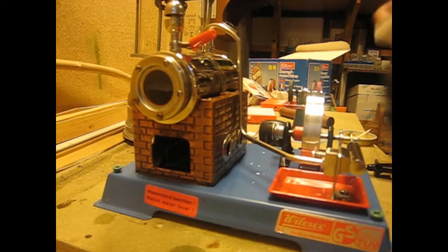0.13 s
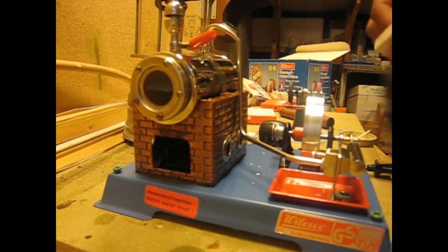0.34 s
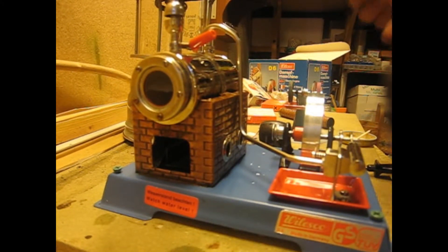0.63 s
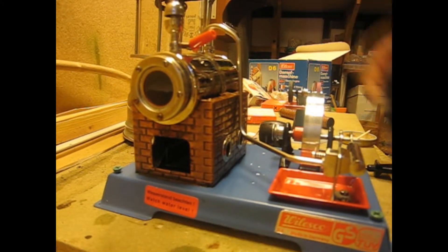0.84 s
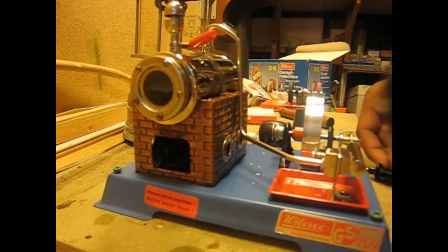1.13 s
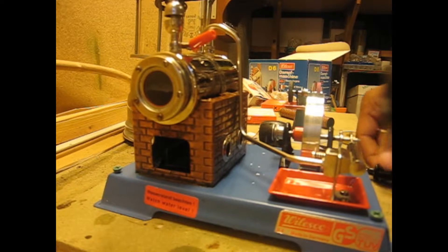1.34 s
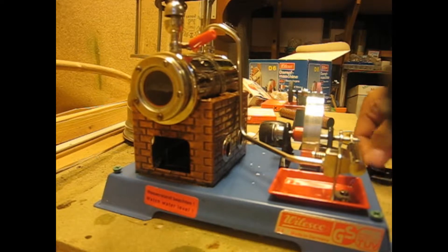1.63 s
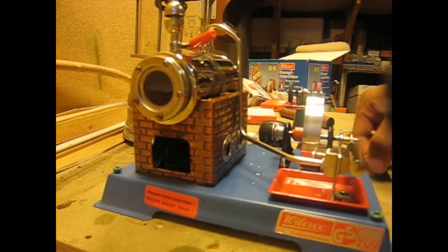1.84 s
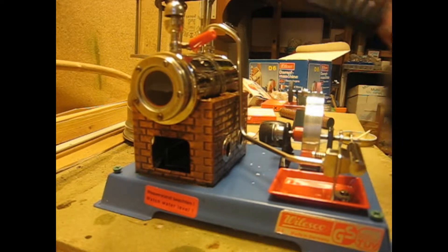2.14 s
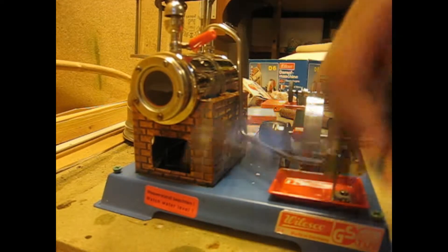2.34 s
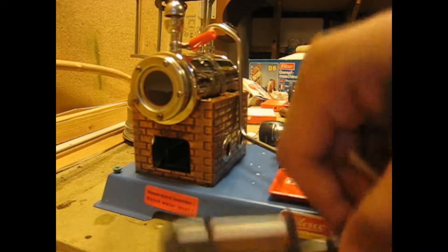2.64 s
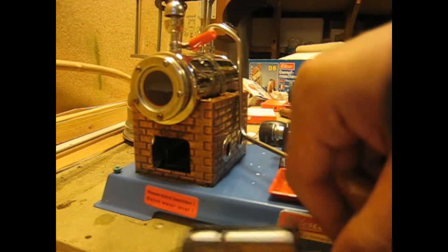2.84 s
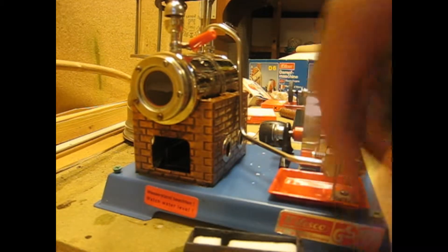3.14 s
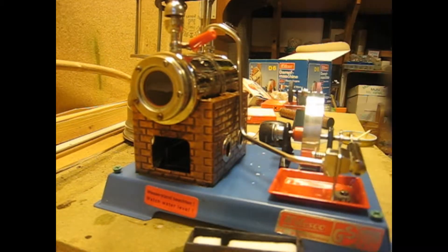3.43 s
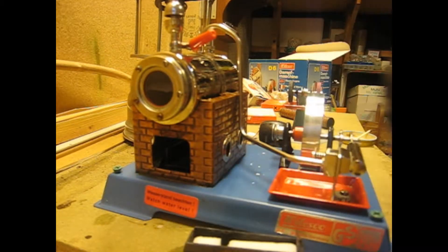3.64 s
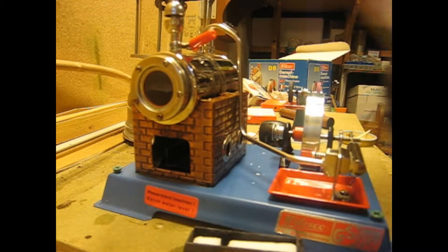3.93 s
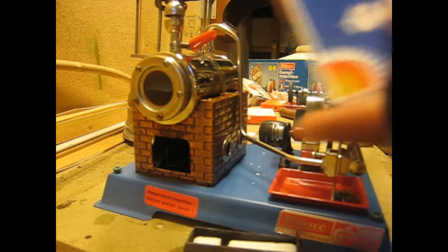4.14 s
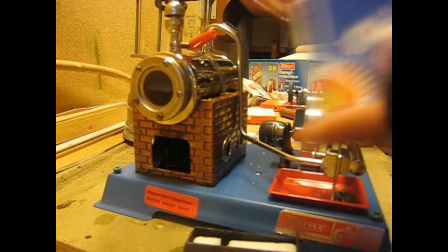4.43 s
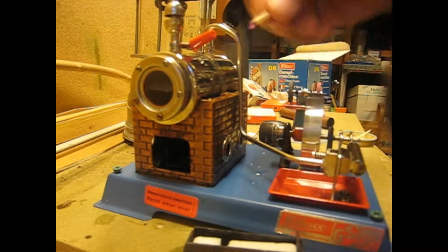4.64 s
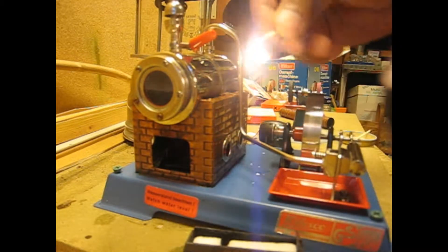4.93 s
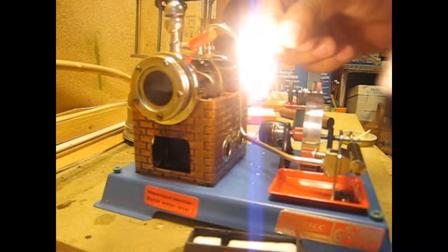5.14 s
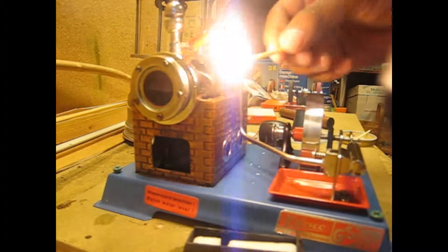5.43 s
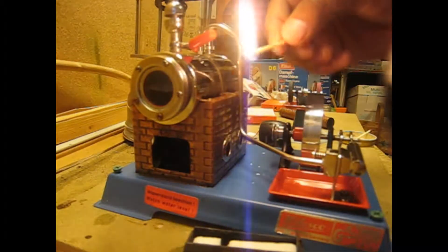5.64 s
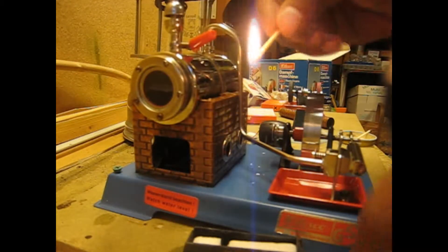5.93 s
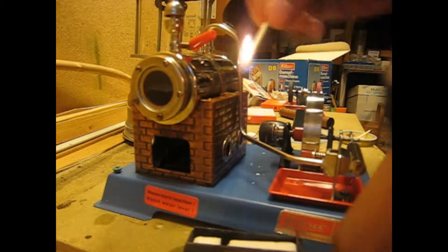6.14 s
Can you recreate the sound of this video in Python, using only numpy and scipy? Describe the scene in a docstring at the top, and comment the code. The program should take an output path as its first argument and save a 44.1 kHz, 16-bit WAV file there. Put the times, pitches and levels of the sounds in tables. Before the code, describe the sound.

Loose matches rattle in a card box, tin knocks ring briefly, then wooden snaps, one quick match strike, a faint flare and a shutting scrape.

```python
"""Matchbox and tin parts on a workbench

Beside a toy steam engine a matchbox rattles and small tin parts are set down. The drawer slides open,
a match is picked out and struck; it pops alight and hisses while the drawer scrapes shut.
Contacts are short damped cycles and friction is a train of random slips; both excite resonant bodies.
The sum is kept in coarse steps at a quarter of the rate, leaving faint mirror images in the treble.
"""
import sys
import numpy as np
from scipy import signal
from scipy.fft import rfft, irfft, next_fast_len
from scipy.io import wavfile
from scipy.ndimage import map_coordinates

SR = 44100
rng = np.random.default_rng(int(sys.argv[2]) if len(sys.argv) > 2 else 0)


def generate_wav(signal):
    """Clip the signal to [-1, 1] and save it as 16-bit WAV at the path in sys.argv[1]."""
    frames = np.transpose(np.atleast_2d(signal))
    scaled = np.clip(frames, -1, 1) * 32767
    pcm = np.round(scaled).astype(np.int16)
    wavfile.write(sys.argv[1], SR, pcm)


N = 277171  # length in samples

# Levels in the tables are nominal: the sources weight them further.

# Shakes throwing the loose matches against a wall: start_s, length_s, level_db
RATTLES = [(0, 0.045, -41), (0.048, 0.013, -33.5), (0.193, 0.0079, -37.5), (0.218, .012, -33.5),
           (.274, .015, -26), (0.318, .029, -24), (0.465, 0.0083, -32), (0.506, 0.007, -33.5)]
TUMBLE_S, TUMBLE_DB = .04, -15  # after each throw the matches tumble on, this long and this much softer
# Resonances of the full box: centre_hz, width_hz, level_db
FULL_BOX = [(595, 100, -1.5), (1113, 190, -4), (1575, 260, -1), (2287, 300, 0.5), (3710, 400, -0.5),
            (5285, 1300, -9)]
# Narrow resonances of the card walls: centre_hz, width_hz, level_db
WALLS = [(592, 45, -1.5), (1298, 41, -2), (1457, 39, -1), (1595, 48, -2.5), (1830, 47, -3),
         (2142, 48, -4.5), (3194, 62, -5), (3800, 48, -7)]

# Matches sliding down the tilted box
SETTLE_S, SETTLE_LENGTH_S, SETTLE_DB, SETTLE_RISE_DB = .443, .212, -44.5, 7
# Resonances of the sleeve as matches settle and slide: centre_hz, width_hz, level_db
SLEEVE = [(1610, 490, 1.5), (3590, 970, -6.5)]

# Tin parts set down: start_s, clack_db, near_edge_hz, far_edge_hz, far_edge_delay_s, tin_ring_db, thud_db
KNOCKS = [(1.1351, -11.5, 1750, 1000, 0.0053, -16.5, -32.5), (1.6225, -20, 950, 560, .019, -34, -30.5),
          (1.926, -42, 1073, 2600, .006, -51, -45), (2.798, -9.5, 1150, 1500, 0.0091, -17.5, -29.5),
          (2.943, -42, 966, 963, 0.013, -61, -36.5), (3.0791, -10.5, 900, 1800, 0.013, -16.5, -22.5)]
ROCK_LOSS_DB, RING_LOSS_DB, THUD_LOSS_DB = 5, 9, 4.5  # losses at the second contact
LOSS_GROWTH, ROCK_SPREAD = 1.3, .85  # later contacts lose ever more; a spread under 1 closes them up
# A part's high mode; a duller contact feeds it less, by this much per octave
BRIGHT_HZ, BRIGHT_DB, BRIGHT_FALL_DB = 2750, 3.5, 12
# Modes of the engine's tin base plate: mode_hz, level_db, t60_s
TIN_MODES = [(531, -20, 0.17), (803, -15.5, 0.14), (916, -16.5, 0.13), (1050, -8.5, 0.11),
             (1182, -14, 0.097), (1314, -20.5, 0.13), (1482, -16, 0.13), (1626, -3.5, .11),
             (1910, -23.5, 0.054), (2190, -21.5, 0.063), (2695, -15.5, 0.088), (2570, -15, 0.1),
             (2900, -35.5, 0.17), (3030, -35, .07)]
# Spectrum of the bench thud: frequency_hz, density_db (dB per Hz)
BENCH_SPECTRUM = [(30, -14.5), (55, -4), (85, 4), (120, -5), (165, -2), (220, -3), (285, 3), (370, -13.5),
                  (800, -12), (1500, -24.5), (3000, -37)]
# The bench top flexing under a hand: start_s, level_db
BUMPS = [(3.14, -28), (6.05, -38), (6.111, -32)]
# The bench's lowest mode relative to the thud; extra dB of flexing per dB of thud above -30 dB
FLEX_DB, FLEX_GROWS = 2, .7

DRAG_S, DRAG_LENGTH_S, DRAG_DB = 1.15, .4, -44  # a part dragged over the bench
# Its resonance sinks ever faster; it bites just before it stops
DRAG_START_HZ, DRAG_SINK_HZ, DRAG_BEND, DRAG_BITE_DB = 2503, 814, 1.4, 4
# Spectrum of the dragged part: frequency_hz, density_db (dB per Hz)
DRAG_SPECTRUM = [(60, -4), (200, -1), (450, -8.5), (600, -1), (900, -5), (2800, -4.5), (4000, -5.5),
                 (5500, -12.5)]

# A part rubbing on the bench around its landing: start_s, length_s, level_db
RUBS = [(1.596, .024, -35.5), (1.655, .045, -41), (1.81, .045, -48), (1.885, .065, -44.5)]
# Spectrum of the rubbing: frequency_hz, density_db (dB per Hz)
RUB_SPECTRUM = [(70, -3), (280, 0), (420, -8), (900, -4), (1400, -14), (3000, -22), (5000, -35)]

# A few matches shifting as the box is moved: start_s, length_s, level_db, pitch_hz
SHIFTS = [(2.04, .018, -49.5, 1479), (2.128, .014, -43, 3770), (2.281, 0.015, -39, 3106),
          (2.516, 0.012, -48, 4320), (3.488, .036, -45.5, 4780), (3.65, 0.039, -40.5, 2377)]

# Pushes on the drawer, two to open it and two to shut it: start_s, length_s, level_db
SLIDES = [(3.318, 0.39, -41.7), (3.771, .048, -40.5), (5.163, .03, -34), (5.22, .225, -30.3)]
SLIDE_ATTACK_S, SLIDE_RELEASE_S = .01, .035  # how fast a push starts and ends
UNEVEN_DB, UNEVEN_PER_S = 1.3, 50  # the drawer's friction comes and goes: depth, knots per second
# The drawer's hardest catches: start_s, level_db
JERKS = [(3.384, -30), (3.431, -27.5), (3.5475, -28), (3.576, -29.5), (3.692, -32), (3.731, -36),
         (3.807, -30), (5.2225, -17), (5.2805, -22), (5.3505, -17), (5.382, -23), (5.402, -12.5),
         (5.422, -22.5)]
JERK_S = .0036  # length of one catch
# Resonances of the hollow drawer: centre_hz, width_hz, level_db
DRAWER_BODY = [(560, 380, -20), (1345, 180, 0), (2193, 550, -12), (3370, 870, -18)]
# Spectrum of the whole box jolting in the hand: frequency_hz, density_db (dB per Hz)
JOLT_SPECTRUM = [(35, -9.5), (70, 2.5), (200, -4.5), (450, -17.5), (1000, -28.5), (3000, -34.5)]
# Jolt levels; the first three are relative to their cause
SCUFF_JOLT_DB, SNAP_JOLT_DB, JERK_JOLT_DB, PUSH_JOLT_DB = -8, -28, -20, -29

# Fingers scuffing the card: start_s, length_s, level_db
SCUFFS = [(3.898, 0.041, -40.5), (3.962, .035, -32.5), (4.076, .027, -36), (4.223, .034, -26),
          (4.342, 0.065, -38.5), (4.63, 0.056, -42)]
# Resonances of the scuffed wall: centre_hz, width_hz, level_db
CARD = [(620, 400, -8.5), (1704, 650, -1), (3370, 1100, -8)]

# Single snaps of wood on card: start_s, level_db, pitch_hz
SNAPS = [(3.8987, -15, 1990), (4.0645, -23, 2290), (4.092, -22, 1796), (4.1302, -12, 3050),
         (4.1497, -17.5, 3130), (4.344, -25, 1330), (4.358, -19.5, 1690), (4.3734, -20.5, 1800),
         (4.234, -18, 1750), (4.410, -26, 1300), (4.4477, -13, 1930), (4.47, -3.5, 2080),
         (4.6767, -15.5, 3000), (4.964, -23, 2650), (5.358, -12.5, 2670), (5.404, -7.5, 2600)]
SNAP_WALL_HZ, SNAP_WALL_DB = 1650, -11  # the wall's own note under every snap

# The match head lands, skips along the striker at this period and grips this long each time
STRIKE_S, SKIP_S, GRIP_S = 4.4475, .0112, .0075
# Pressure peaks at this share of the stroke and falls off to both sides
STRIKE_DB, STRIKE_PEAK, STRIKE_ARCH_DB = -19.3, .45, 20
STRIKE_BRIGHTEN_DB = 9  # growth of the rasp's upper resonance along the stroke
PANEL_START_HZ, PANEL_END_HZ = 536, 740  # the panel's resonance climbs as the head nears its end
# The striker's rasp and its upper resonance: centre_hz, width_hz, level_db
STRIKER = [(1900, 500, -7), (3520, 1800, -13)]

IGNITE_S, BURN_S, FLARE_DB, FLARE_SAG_DB = 4.7695, .87, -39.8, -6  # the head catches, then burns down
SPUTTER_DB, SPUTTER_PER_S = 1.3, 25  # the flame's hiss comes and goes: depth, knots per second
# Resonances of the flame's hiss: centre_hz, width_hz, level_db
FLAME = [(133, 120, 0.5), (613, 69, 5.5), (1300, 520, -5), (2530, 800, -4), (4260, 1900, -9.5)]

# Spectrum of the faint rumble and hiss of the workshop: frequency_hz, density_db (dB per Hz)
AIR = [(20, -3.5), (50, -4), (90, 4.5), (130, -5.5), (300, -8.5), (700, -15), (2000, -18), (5000, -26.5)]
# Response of the smoothing between stored steps: frequency_hz, gain_db
INTERPOLATION = [(1500, 0.5), (3000, -2), (3800, -2), (4600, -6), (5500, -9), (7200, -25.5), (9000, -47),
                 (10000, -64.5)]
STEP, TOP_HZ = 1 / 128, 10104  # size of a stored step (full scale 1); upper limit of the band


def amp(db):
    """Decibels: a gain is ten to the power of dB / 20."""
    return 10 ** (np.asarray(db) / 20)


def unit(x):
    """Normalization: scale a signal to rms 1."""
    return x / np.sqrt(np.mean(x ** 2) + 1e-20)


def add(track, s, x):
    """Superposition: mix x into the track from time s."""
    part = track[max(0, round(s * SR)):][:len(x)]
    part += x[:len(part)]


def filtered(x, response):
    """Linear filtering: multiply the spectrum of x by a function of frequency."""
    m = next_fast_len(len(x) + 8192)
    return irfft(rfft(x, m) * response(np.fft.rfftfreq(m, 1 / SR)), m)[:len(x)]


def coloured(x, points):
    """Spectral shaping: a gain in dB, interpolated over log frequency."""
    hz, db = np.transpose(points)
    return filtered(x, lambda f: amp(np.interp(np.log(f + 1), np.log(hz), db)))


def resonate(x, body):
    """Modal response: damped resonators in parallel, of alternating polarity."""
    def response(f):
        total = 0
        for k, (centre, width, db) in enumerate(body):
            damping = 1j * f * width
            total = total + (-1) ** k * amp(db) * damping / (centre * centre - f * f + damping)
        return total
    return filtered(x, response)


def level(s, length, db, attack, release, change_db=0):
    """Envelope: an attack, a hold that drifts by change_db, and a release."""
    t = np.arange(N) / SR - s
    hold = amp(db + change_db * np.clip(t / length, 0, 1))
    return hold * np.clip(t / attack, 0, 1) * np.clip(1 - (t - length) / release, 0, 1) ** 2


def grit(n, rate, smooth):
    """Dry friction: tiny slips at random moments over a smooth hiss."""
    happens = rng.random(n) < rate / SR
    slips = happens * rng.choice([-1, 1], n) * np.exp(.35 * rng.standard_normal(n))
    return unit(slips) + smooth * rng.standard_normal(n)


def stroke(length, body, rate, smooth, release, attack):
    """Friction-driven resonance: a short run of slips rings a body and fades."""
    t = np.arange(SR // 4) / SR
    envelope = (1 - np.exp(-t / attack)) * np.exp(-np.maximum(t - length, 0) / release)
    x = resonate(grit(len(t), rate, smooth) * envelope, body)
    return x / np.sqrt(np.sum(x ** 2) / np.sum(envelope ** 2))


def click(hz, cycles, crack):
    """Impact: a few swelling and dying cycles with a noisy edge, of peak 1."""
    t = np.arange(SR // 20) / SR
    u = t * hz / cycles
    edge = coloured(rng.standard_normal(len(t)), [(1500, 9.0), (5000, 6.5), (7000, -42.0)])
    x = u * np.exp(1 - u) * np.sin(2 * np.pi * hz * t) + crack * edge * np.exp(-u / 2)
    return x / np.abs(x).max()


def ring(modes, attack, scatter_db):
    """Free vibration: exponentially decaying modes, at new strengths for each blow."""
    t = np.arange(SR // 2) / SR
    x = np.zeros(len(t))
    for hz, db, t60 in modes:
        decay = amp(db + scatter_db * rng.normal() - 60 * t / t60)
        x += decay * np.sin(2 * np.pi * (hz * t + rng.random()))
    return x * (1 - np.exp(-t / attack))


def puff(spectrum, attack, t60):
    """High modal density: a toneless decaying noise of peak rms about 1."""
    t = np.arange(SR // 2) / SR
    noise = unit(coloured(rng.standard_normal(len(t)), spectrum))
    return noise * (1 - np.exp(-t / attack)) * amp(-60 * t / t60)


def ticks(length, rate, centre_hz):
    """Random impacts: matches hit each other, each at its own pitch; rms 1 over the length."""
    out = np.zeros(SR // 4)
    draws = rng.random((40, 3))[:int(np.clip(2 + length * rate, 2, 40))]
    for when, size, pitch in draws:
        hz = centre_hz * 2 ** (1.4 * (pitch - .5))
        add(out, when * length, amp(-14 * size) * click(hz, cycles=3.7, crack=0.57))
    return out / np.sqrt(np.sum(out ** 2) / (length * SR))


def wobble(rate):
    """Slow fluctuation: a smooth random curve with this many knots a second."""
    knots = rng.standard_normal(int(N * rate / SR) + 4)
    return map_coordinates(knots, [np.arange(N) * rate / SR])


def matchbox():
    """Coupled resonance: rattles, shifts, scuffs and snaps make the card walls ring on briefly."""
    out = rattles() + shifts() + scuffs() + snaps()
    return out + amp(-1.0) * sum(resonate(out, [mode]) for mode in WALLS)


def rattles():
    """Collision noise: thrown matches strike the full box, then tumble on more softly."""
    out = np.zeros(N)
    for s, length, db in RATTLES:
        for start, span, loud_db in [(s, length, db), (s + length, TUMBLE_S, db + TUMBLE_DB)]:
            body = stroke(span, FULL_BOX, rate=1200, smooth=0.34, release=0.011, attack=0.0013)
            add(out, start, amp(loud_db - 2) * body)
            add(out, start, amp(loud_db - 6.5) * ticks(span, rate=280, centre_hz=3400))
    return out


def settling():
    """Sliding friction: matches slip down the tilted box and excite its sleeve, ever louder."""
    slide = unit(resonate(grit(N, rate=600, smooth=.6), SLEEVE))
    return slide * level(SETTLE_S, SETTLE_LENGTH_S, SETTLE_DB, attack=0.012, release=.035,
                         change_db=SETTLE_RISE_DB)


def knocks():
    """Rocking impact: a part settles edge to edge; each contact clacks, rings the plate and thuds."""
    out = np.zeros(N)
    for s, db, near_hz, far_hz, delay, tin_db, thud_db in KNOCKS:
        for k, hz in enumerate([near_hz, far_hz, near_hz, far_hz]):
            when, spent = s + delay * k ** ROCK_SPREAD, k ** LOSS_GROWTH
            clack_db = db - ROCK_LOSS_DB * spent
            bright_db = BRIGHT_DB - BRIGHT_FALL_DB * np.log2(BRIGHT_HZ / hz)
            clack = click(hz, cycles=1.1, crack=0.13)
            clack = clack + amp(bright_db) * click(BRIGHT_HZ, cycles=2.6, crack=.22)
            add(out, when, amp(clack_db) * clack)
            clatter = puff([(300, -9), (950, -1), (1700, -7), (3000, -4), (5000, -39)],
                           attack=0.0012, t60=0.055)
            add(out, when, amp(clack_db - 17.5) * clatter)
            # a contact feeds most the plate modes near its own pitch
            modes = [(f, gain_db - 9.5 * abs(np.log2(f / hz)), t60) for f, gain_db, t60 in TIN_MODES]
            plate = ring(modes, attack=0.0013, scatter_db=0.5)
            add(out, when, amp(tin_db + 3.5 - RING_LOSS_DB * spent) * plate)
            thud = puff(BENCH_SPECTRUM, attack=0.0019, t60=0.18)
            add(out, when, amp(thud_db - THUD_LOSS_DB * spent) * thud)
        add(out, s, flex(thud_db + FLEX_DB + FLEX_GROWS * max(0, thud_db + 30)))
    return out


def flex(db):
    """Fundamental mode: the bench top's lowest resonance, struck once."""
    return amp(db) * ring([(86, 0.0033, .15)], attack=0.0062, scatter_db=1)


def drag():
    """Moving resonance: a fine scrape sinks as the part slides; the bench rumbles under it at first."""
    travel = np.clip((np.arange(N) / SR - DRAG_S) / DRAG_LENGTH_S, 0, 1)
    phase = 2 * np.pi * np.cumsum(DRAG_START_HZ - DRAG_SINK_HZ * travel ** DRAG_BEND) / SR
    # low-passed friction times a cosine makes a noise band around the sinking pitch
    band = unit(filtered(grit(N, rate=700, smooth=0.56), lambda f: 1 / (1 + (f / 310) ** 2)))
    body = unit(coloured(grit(N, rate=900, smooth=.8), DRAG_SPECTRUM))
    scrape = amp(DRAG_BITE_DB * travel ** 12) * (amp(1.8) * band * np.cos(phase) + amp(2.2) * body)
    rumble_spectrum = [(70, -11), (160, 0.5), (290, 0), (400, -20), (1500, -47)]
    rumble = unit(coloured(rng.standard_normal(N), rumble_spectrum)) * amp(3.5 - 26 * travel)
    return level(DRAG_S, DRAG_LENGTH_S, DRAG_DB, attack=0.012, release=0.029) * (scrape + rumble)


def rubbing():
    """Sliding friction: a part rubs dully on the bench around its landing."""
    pressure = sum(level(s, length, db, attack=.02, release=.035) for s, length, db in RUBS)
    return pressure * unit(coloured(grit(N, rate=400, smooth=.4), RUB_SPECTRUM))


def shifts():
    """Sparse impacts: a few matches tick together as the box is moved."""
    out = np.zeros(N)
    for s, length, db, hz in SHIFTS:
        add(out, s, amp(db) * ticks(length, rate=680, centre_hz=hz))
    return out


def bumps():
    """Impulsive load: a hand flexes the bench top."""
    out = np.zeros(N)
    for s, db in BUMPS:
        add(out, s, flex(db))
    return out


def drawer():
    """Stick-slip: the drawer catches and slips in its sleeve and rings the hollow of the box."""
    push = sum(level(s, length, db, SLIDE_ATTACK_S, SLIDE_RELEASE_S) for s, length, db in SLIDES)
    hollow = unit(resonate(grit(N, rate=700, smooth=0.36), DRAWER_BODY))
    # sticks pinched by the moving drawer
    crackle = unit(resonate(grit(N, rate=89, smooth=0.091), [(2750, 1000, 0)]))
    friction = amp(UNEVEN_DB * wobble(UNEVEN_PER_S))
    out = push * friction * (amp(0.2) * hollow + amp(-14) * crackle)
    for s, db in JERKS:
        catch = stroke(JERK_S, DRAWER_BODY, rate=1800, smooth=0.67, release=0.0032, attack=0.00053)
        add(out, s, amp(db - 1.5) * catch)
        add(out, s, jolt(db + JERK_JOLT_DB))
    shutting_s = SLIDES[2][0]
    add(out, shutting_s, jolt(PUSH_JOLT_DB))  # a finger lands on the drawer to shut it
    return out


def jolt(db):
    """Rigid-body motion: the dull bump of the whole box in the hand."""
    return amp(db) * puff(JOLT_SPECTRUM, attack=0.00035, t60=.08)


def scuffs():
    """Rough contact: fingers slip over a card wall and jolt the box."""
    out = np.zeros(N)
    for s, length, db in SCUFFS:
        scuff = stroke(length, CARD, rate=1300, smooth=0.23, release=.007, attack=0.005)
        add(out, s, amp(db - 1.0) * scuff)
        add(out, s + length / 2, jolt(db + SCUFF_JOLT_DB))
    return out


def snaps():
    """Impact on a panel: wood snaps on card at its own pitch, over the wall's note."""
    out = np.zeros(N)
    for s, db, hz in SNAPS:
        wall = amp(SNAP_WALL_DB) * click(SNAP_WALL_HZ, cycles=1.1, crack=0.22)
        add(out, s, amp(db) * (click(hz, cycles=1.05, crack=.33) + wall))
        add(out, s, jolt(db + SNAP_JOLT_DB))
    return out


def strike():
    """Stick-slip: the match head skips along the striker, each grip ringing rasp and panel."""
    out = np.zeros(N)
    rasp, (upper_hz, upper_width, upper_db) = STRIKER
    for k, travel in enumerate(np.linspace(0, 1, 6)):
        panel = (PANEL_START_HZ + (PANEL_END_HZ - PANEL_START_HZ) * travel, 170, -2.5)
        upper = (upper_hz, upper_width, upper_db + STRIKE_BRIGHTEN_DB * (travel - .5))
        db = STRIKE_DB - STRIKE_ARCH_DB * (travel - STRIKE_PEAK) ** 2
        grip = stroke(GRIP_S, [panel, upper, rasp], rate=1800, smooth=.4,
                      release=0.0018, attack=0.00041)
        add(out, STRIKE_S + k * SKIP_S, amp(db) * grip)
    add(out, STRIKE_S, jolt(-31))
    return out


def flame():
    """Combustion noise: the head catches with a pop and burns with a sputtering hiss."""
    burn = level(IGNITE_S, BURN_S, FLARE_DB, attack=.012, release=.06, change_db=FLARE_SAG_DB)
    sputter = amp(SPUTTER_DB * wobble(SPUTTER_PER_S))
    out = burn * sputter * unit(resonate(grit(N, rate=150, smooth=1.2), FLAME))
    add(out, IGNITE_S, amp(-17.5) * click(740, cycles=.45, crack=0.43))
    pop = puff([(50, -4), (150, 14), (600, -6), (1200, -10), (3000, -33)], attack=0.00039, t60=0.043)
    add(out, IGNITE_S, amp(-25.5) * pop)
    return out


def room(x, t60, wet_db):
    """Reverberation: convolution with the short, dull noise tail of a cluttered workshop."""
    t = np.arange(SR // 2) / SR
    noise = coloured(rng.standard_normal(len(t)), [(300, 1.5), (2000, -1.0), (5000, -2.5), (7000, -28.5)])
    tail = noise * amp(-60 * t / t60) * (1 - np.exp(-t / .004))
    return x + amp(wet_db) * signal.fftconvolve(x, tail / np.linalg.norm(tail))[:N]


def scene():
    """Superposition: all sources in the workshop, over its faint rumble and hiss."""
    box = matchbox() + settling() + drawer()
    bench = knocks() + drag() + rubbing() + bumps()
    near = box + bench + strike() + flame()
    air = amp(-50.8) * unit(coloured(rng.standard_normal(N), AIR))
    return (room(near, t60=0.24, wet_db=-20.5) + air)[None]


def record(dry):
    """Sampling and quantization: a quarter of the rate in 8-bit steps, with faint mirror images above."""
    hop = 4
    slow = signal.resample_poly(dry[0], 1, hop)
    held = np.zeros(N)
    # a small offset makes the lowest bit flicker
    held[::hop] = hop * STEP * np.round(slow / STEP + .3)
    return filtered(coloured(held, INTERPOLATION), lambda hz: hz < TOP_HZ)[None]


dry = scene()
out = record(dry)
generate_wav(out)
```